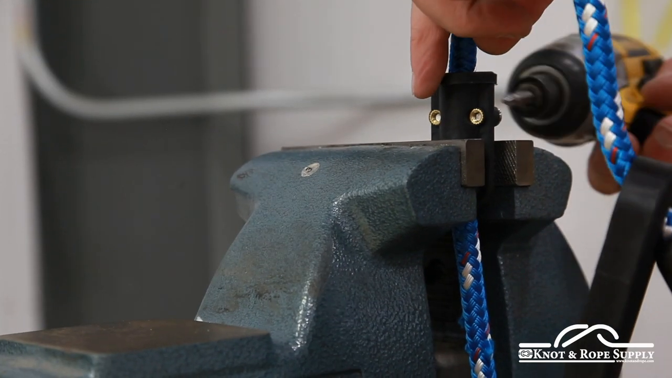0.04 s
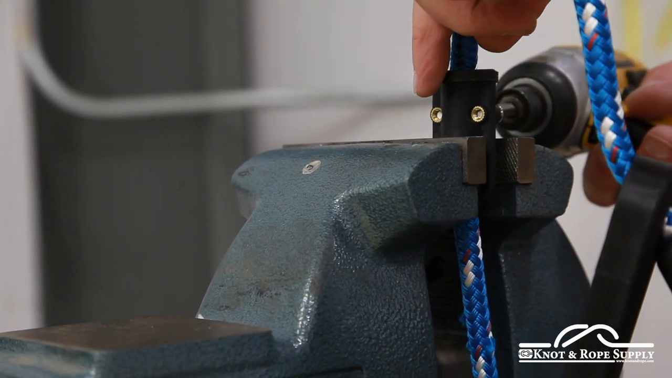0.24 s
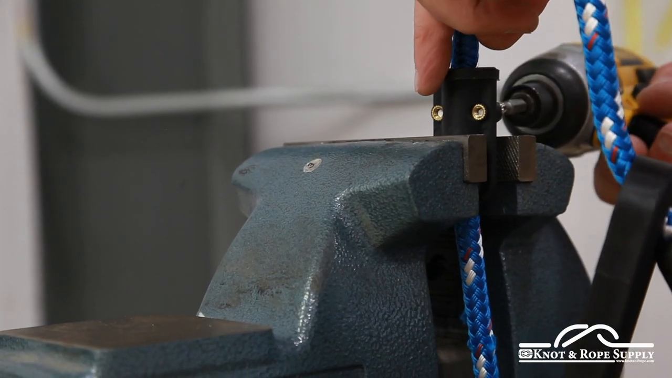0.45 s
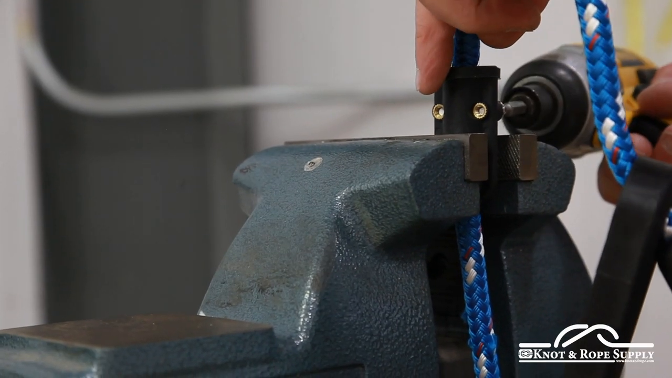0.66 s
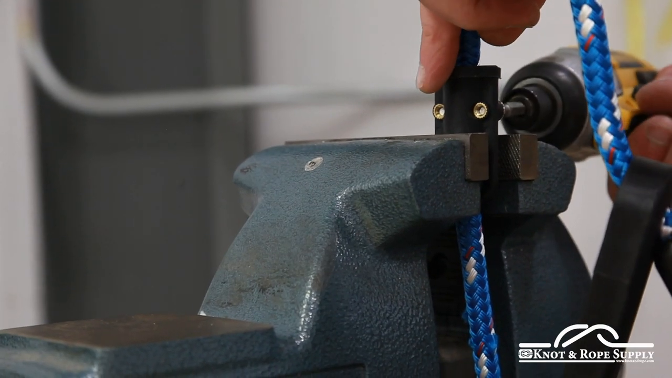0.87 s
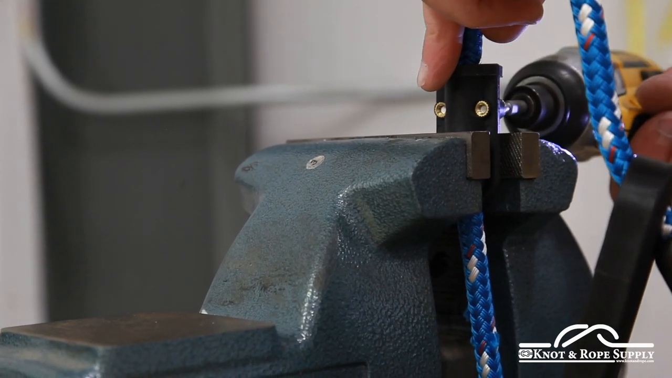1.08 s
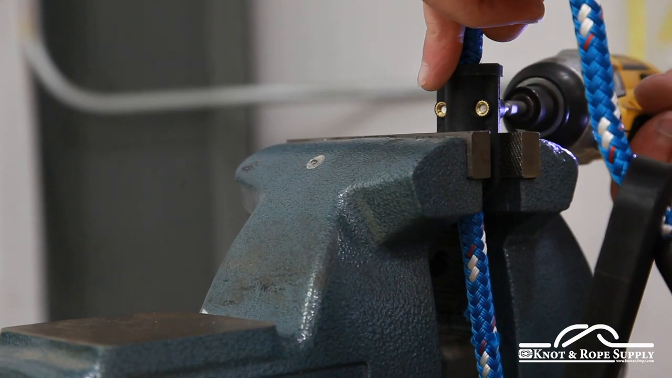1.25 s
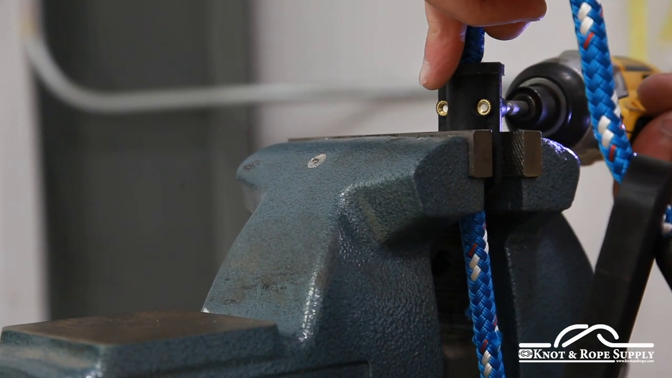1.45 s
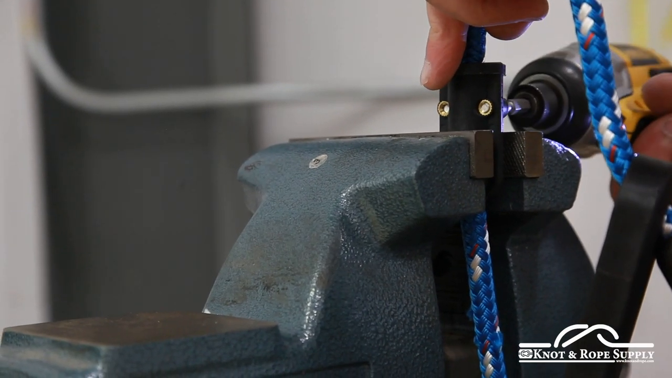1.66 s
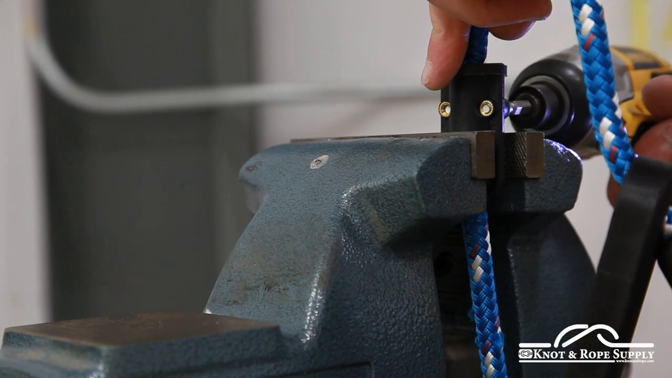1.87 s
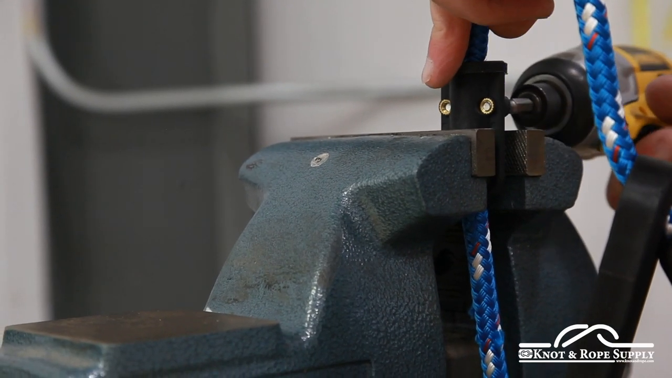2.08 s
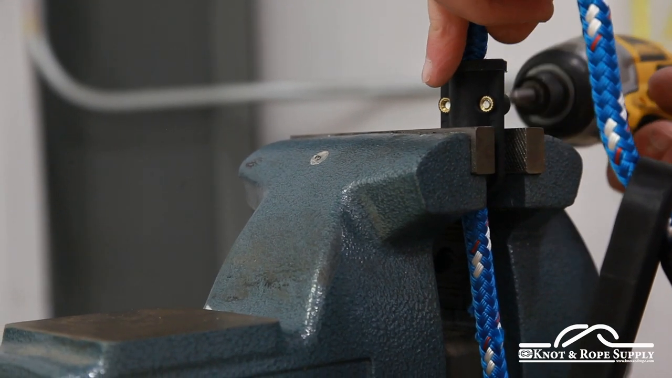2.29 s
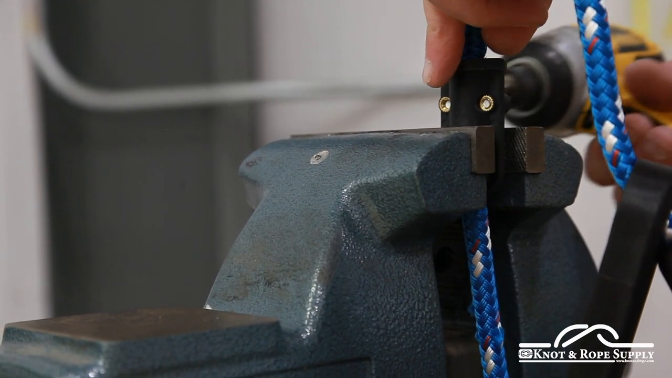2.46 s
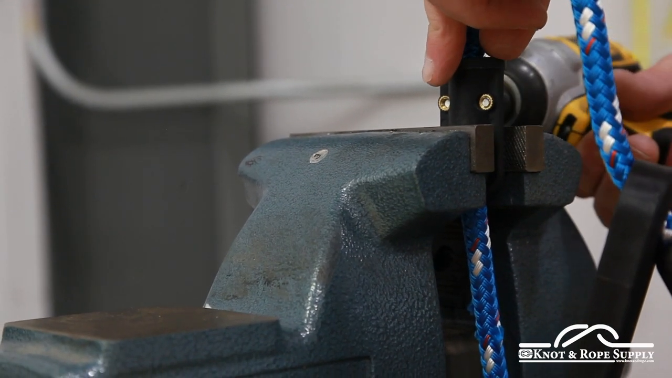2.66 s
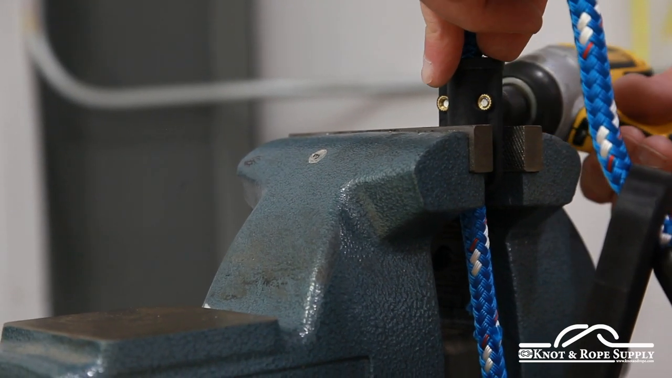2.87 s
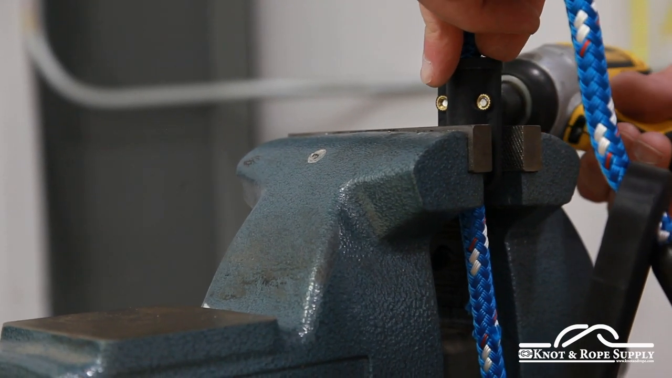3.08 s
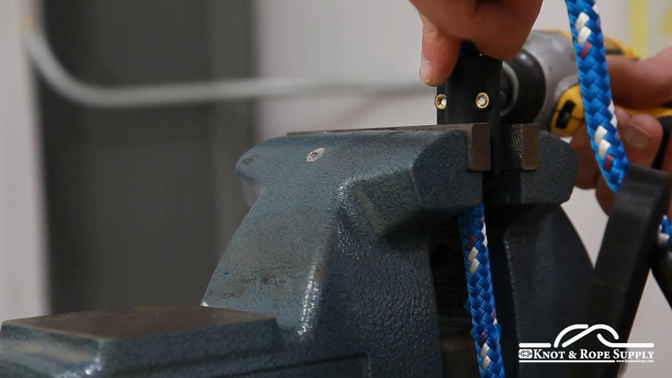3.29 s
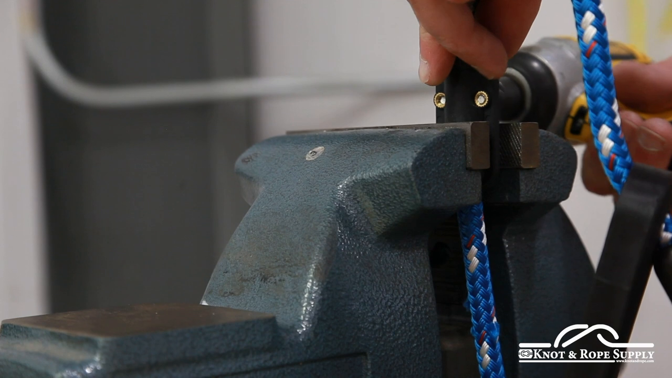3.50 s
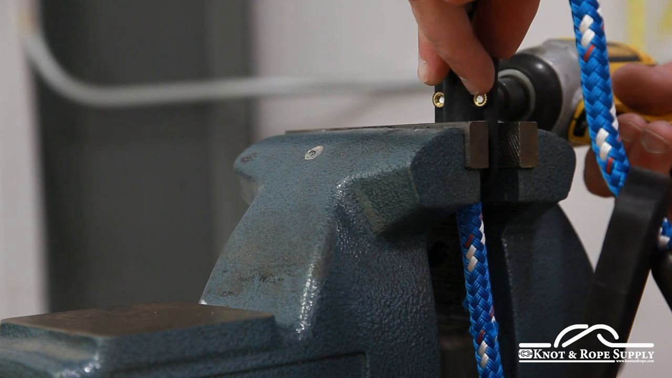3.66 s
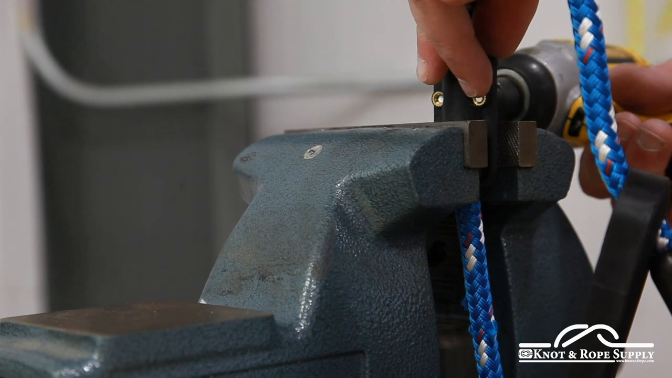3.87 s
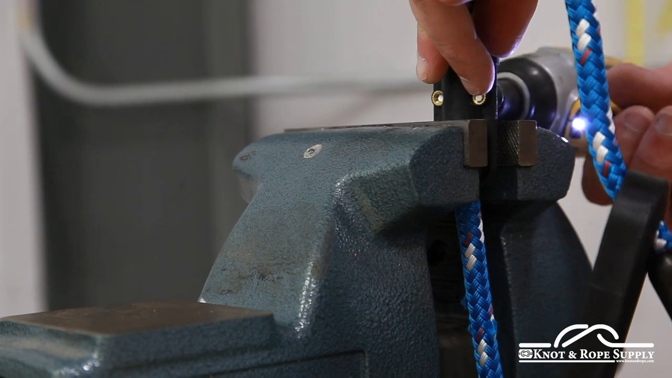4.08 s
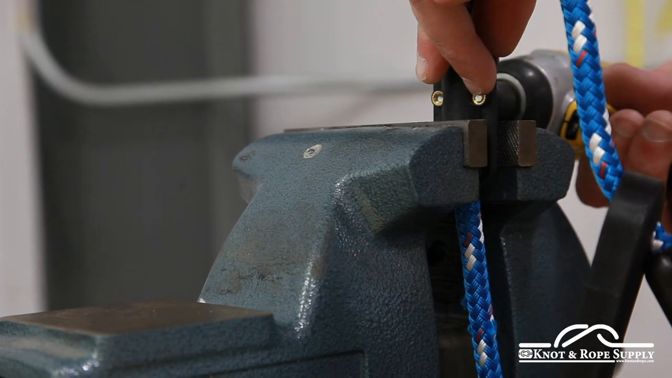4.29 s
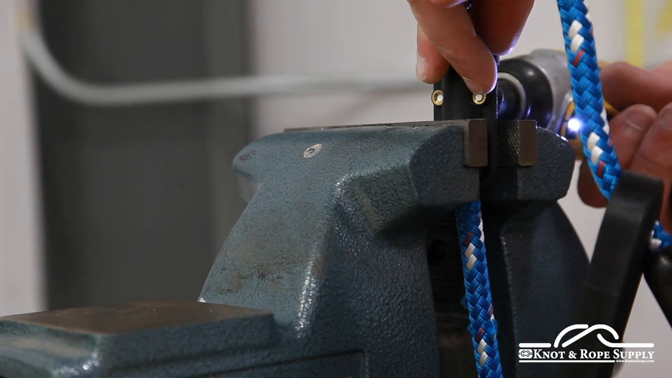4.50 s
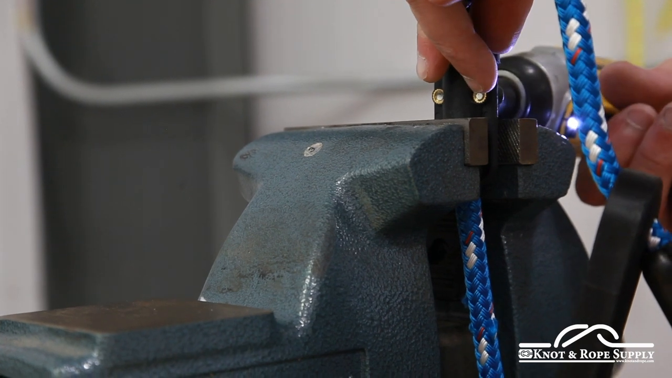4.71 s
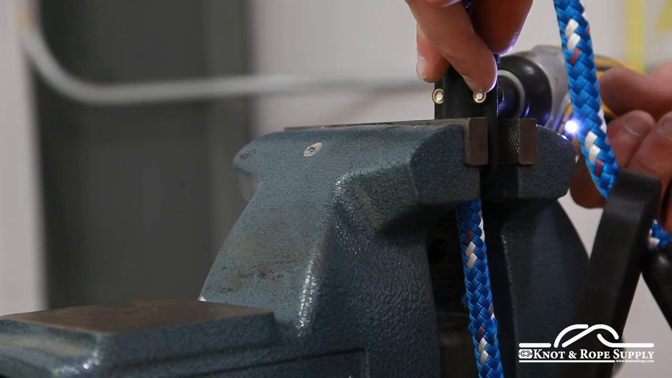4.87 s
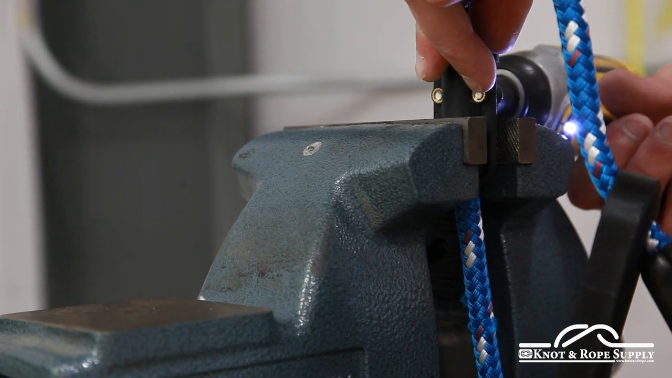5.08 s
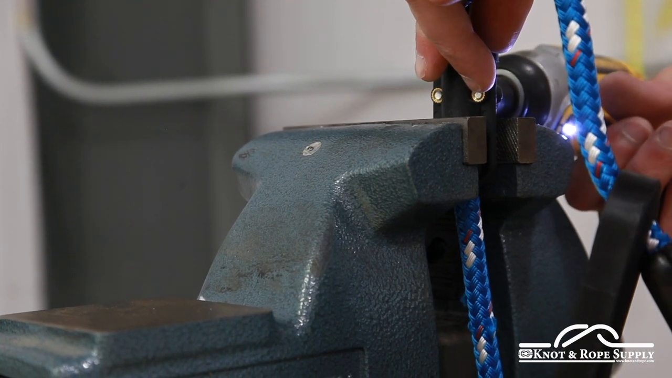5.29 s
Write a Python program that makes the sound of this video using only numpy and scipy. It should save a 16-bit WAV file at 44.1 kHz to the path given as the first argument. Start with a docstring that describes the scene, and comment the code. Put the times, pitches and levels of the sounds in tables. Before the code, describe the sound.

Metal clicks and two brief bursts of a whining cordless driver tightening screws in a workshop, with one loud clatter of hammer blows.

```python
"""A high whistle and a whirr of motor and gears: a cordless impact driver runs two screws into a
rope clamp held in a bench vise, in a workshop. The whistle is the speed control chopping the motor
current. As the first screw seats, the bench thuds and the hammer strikes a few blows that overload
the microphone. In between, the bit scrapes and clicks into the next screw."""
import sys
import numpy as np
from scipy import signal
from scipy.fft import rfft, irfft
from scipy.io import wavfile
from scipy.ndimage import uniform_filter1d

SR = 44100
rng = np.random.default_rng(int(sys.argv[2]) if len(sys.argv) > 2 else 0)


def to_wav(s):
    """Save 16-bit WAV."""
    ch = np.atleast_2d(s).T  # columns
    pcm = np.round(np.clip(ch, -1, 1) * 32767)  # PCM
    wavfile.write(sys.argv[1], SR, pcm.astype(np.int16))


N = 235714
T = np.arange(N) / SR

# Contacts of bit, screw and clamp. Each row: time in seconds, level in dB, relative treble in dB.
CONTACTS = [(0.4748, -25, -10), (0.5327, -30, -1), (0.5536, -22, -46), (0.8674, -20, -9),
            (0.8839, -12.5, -17.5), (0.9115, -24, -12), (1.0266, -6.5, -18), (1.1209, -29, -26.5),
            (1.3164, -11, -18), (2.1226, -4.5, -14), (2.2787, -13.5, -14.5), (2.6753, -25.5, -5),
            (2.9991, -23.5, -36), (3.0475, -31.5, 0.5), (3.0834, -36, -12), (3.1951, -30.5, -1.5),
            (3.2091, -23, -22.5), (3.319, -30, -18.5), (3.3842, -33.5, -12), (3.6905, -24.5, -25.5),
            (3.7519, -32, -1.5), (3.979, -34, -22.5), (4.0163, -20, -31), (4.0692, -23.5, -16),
            (4.1106, -11, -27), (4.156, -7.5, -28), (4.322, -26, -16)]
# Spectrum of light metal contact. Each row: frequency in Hz, density in dB.
CONTACT_SPECTRUM = [(200, -13), (750, -6), (1200, -10.5), (2300, -2.5), (3300, -4.5), (4800, -15.5),
                    (10000, -4), (15500, -18)]


def from_db(db):
    """Decibels to gain."""
    return 10 ** (np.asarray(db) / 20)


def unit_rms(x):
    """Scale to unit rms."""
    return x / np.sqrt(np.mean(x ** 2) + 1e-20)


def at_hz(points, hz):
    """Read a table on a log-frequency axis."""
    points = np.array(points)
    return np.interp(np.log(np.maximum(hz, 1)), np.log(points[:, 0]), points[:, 1])


def noise(n=N):
    """White noise of unit variance."""
    return rng.standard_normal(n)


def drift(rate_hz):
    """Smooth random wander of unit rms."""
    r = np.exp(-2 * np.pi * rate_hz / SR)
    return unit_rms(signal.lfilter([1], [1, -2 * r, r * r], noise(N + SR))[SR:])


def colour(x, spectrum, size=4096):
    """Minimum-phase filter of unit power gain with the given spectrum."""
    hz = np.arange(size // 2 + 1) * SR / size
    gain = unit_rms(from_db(at_hz(spectrum, hz)))
    cepstrum = irfft(np.log(gain))
    cepstrum[1:size // 2] *= 2
    cepstrum[size // 2 + 1:] = 0
    return signal.fftconvolve(x, irfft(np.exp(rfft(cepstrum))))[:N]


def ring(x, hz, t60_s):
    """One mode: a unit impulse starts a decaying sine of height 1."""
    r, w = from_db(-60 / (t60_s * SR)), 2 * np.pi * hz / SR
    return signal.lfilter([0, np.sin(w)], [1, -2 * r * np.cos(w), r * r], x + 1e-18)


def decay(start_s, t60_s):
    """Envelope that jumps to 1 and dies away."""
    start = int(start_s * SR)
    age = T[:min(int(2 * t60_s * SR), N - start)]
    envelope = np.zeros(N)
    envelope[start:start + len(age)] = from_db(-60 * age / t60_s)
    return envelope


def butter(x, hz, kind, order=2):
    """Butterworth filter."""
    return signal.sosfilt(signal.butter(order, hz, kind, fs=SR, output="sos"), x)


def motor(flutter=0.004, throb=0.12, mesh_db=-0.5, tones_db=-2.34, sizzle_db=-21, spun_up_hz=345):
    """Gear teeth tick in the housing, harder once a turn; tones swell as they cross its resonances."""
    # Rotor and gear tones. Each row: multiple of the motor speed, level in dB ahead of the housing.
    orders = [(1, 7.5), (1.78, -4), (2, -9.5), (2.7, -9), (3.56, -4.5), (4.42, -4), (6.2, -6), (8, -5)]
    # Housing response. Each row: frequency in Hz, gain in dB.
    housing = [(250, -27.5), (355, -20.5), (530, -24), (840, -9), (1150, -17.5), (1650, -11), (1850, -9.5),
               (2270, -1.5), (2600, -10.5), (2950, -2.5), (3500, -7.5), (4400, -18), (8000, -20.5),
               (15500, -46.5)]
    speed_hz, gear_gain = drive()
    turns = np.cumsum(speed_hz * (1 + flutter * drift(40))) / SR
    spun_up = np.minimum(speed_hz / spun_up_hz, 1) ** 7
    chatter_db = 0.92 + 1.5 * (1.5 - spun_up)   # slow gears tick one by one
    chatter = from_db(chatter_db * drift(160))
    chatter /= np.sqrt(uniform_filter1d(chatter ** 2, size=3000))
    teeth = noise() * chatter * (1 + throb * np.cos(2 * np.pi * turns))
    mesh = from_db(mesh_db) * unit_rms(colour(teeth, housing))
    tones = 0
    for multiple, db in orders:
        backlash_rad = 0.08 * multiple * drift(75)   # gear play smears the upper tones
        gain = from_db(tones_db + db + at_hz(housing, multiple * speed_hz) + 2 * drift(30))
        tones += gain * np.sqrt(2) * np.sin(2 * np.pi * multiple * turns + backlash_rad)
    sizzle = from_db(sizzle_db) * unit_rms(butter(teeth, [6000, 12000], "band"))
    return gear_gain * (mesh + spun_up * (tones + sizzle))


def drive(binding_s=0.1, gear_db_per_decade=38):
    """Motor speed in Hz and gear gain: each run spins up, holds, then slows as the load takes hold."""
    # Each row: start and onset of slowing in seconds, top speed in turns per second,
    # gear level in dB, spin-up time and slow-down time constant in seconds.
    runs = [(0.976, 1.446, 364, -26, .115, .055), (1.748, 1.9, 150, -26.5, .04, .005),
            (4.075, 4.235, 120, -32, .085, .018), (4.314, 4.44, 140, -37.5, 0.0221, .03),
            (4.417, 4.621, 484, -19.5, .14, .27), (4.901, 5.186, 120, -43, 0.11, .05),
            (5.298, 5.344, 170, -21.5, 0.042, .03)]
    speed_hz, gain = np.zeros((2, N))
    for start_s, slows_s, top_hz, db, spin_up_s, slow_down_s in runs:
        rise = 1 - (1 - np.clip((T - start_s) / spin_up_s, 0, 1)) ** 2
        loaded_s = np.maximum(T - slows_s, 0)
        load = loaded_s / (loaded_s + binding_s)
        share = rise * np.exp(-load * loaded_s / slow_down_s)
        speed_hz = np.maximum(speed_hz, top_hz * share)
        gain = np.maximum(gain, from_db(db) * share ** (gear_db_per_decade / 20))
    return speed_hz * (1 - screw_drag()), gain


def screw_drag():
    """Share of motor speed and whistle pitch lost as the screw drags."""
    # Each row: centre and half-width in seconds, share lost.
    drags = [(1.097, .014, .03), (1.158, 0.021, .024), (1.324, .016, .027), (1.615, 0.063, .048),
             (1.744, .011, .06), (5.3, .07, .02)]
    return sum(share * np.exp(-((T - s) / width_s) ** 2) for s, width_s, share in drags)


def whistle(db_per_hz=0.0497, fade_s=0.0034, octave_db=-23, stutter_db=6):
    """Chopped current makes the windings sing, shaking under load, stuttering at a light trigger."""
    # Each row: start and end in seconds, first and held pitch in Hz, settling time in seconds,
    # level at the held pitch in dB, stutter from 0 to 1.
    whistles = [(0.972, 1.025, 6780, 6150, .045, -63.5, 0.3), (1.033, 1.756, 5330, 6275, .018, -34, 0.2),
                (1.746, 1.91, 5450, 6020, 0.01, -40, 0.03), (4.061, 4.272, 6790, 6550, 0.055, -50.5, 0.99),
                (4.46, 5.301, 5270, 6093, 0.071, -35, 0.07)]
    _, gear_gain = drive()
    sag = screw_drag()
    pitch_hz, gain, stutter = np.zeros((3, N))
    for start_s, end_s, first_hz, held_hz, settle_s, db, unsteady in whistles:
        on = (T >= start_s) & (T < end_s)
        age = T[on] - start_s
        offset_hz = (first_hz - held_hz) * np.exp(-age / settle_s) - held_hz * sag[on]
        pitch_hz[on] = held_hz + offset_hz
        fade = np.minimum(np.minimum(age, end_s - T[on]) / fade_s, 1)
        gain[on] = fade * from_db(db + db_per_hz * offset_hz)   # quieter as the pitch sags
        stutter[on] = unsteady
    jitter = (0.00068 + 0.025 * gear_gain) * drift(80) + 0.016 * stutter * drift(150)
    phase = 2 * np.pi * np.cumsum(pitch_hz * (1 + jitter)) / SR
    gain *= from_db(stutter_db * stutter * drift(80))
    return gain * np.sqrt(2) * (np.sin(phase) + from_db(octave_db) * np.sin(2 * phase))


def hammer(ring_db=-41, ring_t60_s=0.05):
    """Blows on the anvil set the dense modes of driver and vise clanging; the clamp rings briefly."""
    # Each row: time in seconds, level in dB, T60 in seconds.
    blows = [(1.9165, -5.5, 0.06), (1.935, -10.5, 0.061), (1.953, 0, 0.077), (1.965, 12, 0.018),
             (1.977, -0.5, 0.056), (1.984, -6.5, .04)]
    # Each row: frequency in Hz, density in dB.
    clang_spectrum = [(150, -10), (400, -8.5), (550, -10.5), (700, -4.5), (1400, -7.5), (2400, -2.5),
                      (3450, -1), (4200, -13), (11000, -18), (15500, -20)]
    # Each row: frequency in Hz, level in dB.
    clamp_modes = [(1787, 2), (2082, 1.5), (2442, -4.5), (2918, 3), (3151, 1.5), (3399, -4.5)]
    envelope = sum(from_db(db) * decay(s, t60_s) for s, db, t60_s in blows)
    force = uniform_filter1d(envelope, size=50) * noise()
    clang = butter(colour(force, clang_spectrum), 130, "high", order=4)
    return clang + sum(from_db(ring_db + db) * ring(force, hz, ring_t60_s) for hz, db in clamp_modes)


def bench(rumble_db=-15, shake_db=-29):
    """Torque jolts the vise: the bench booms and rumbles, and things on it shake."""
    # Each row: time in seconds, level in dB.
    jolts = [(1.848, -3.5), (1.864, 0.5), (1.87, 3), (1.881, -15), (1.953, -8), (2.072, -8.5),
             (2.19, -23.5), (2.341, -26)]
    # Each row: frequency in Hz, level in dB.
    modes = [(100, -6), (178, -8.5), (275, -10), (327, -12)]
    pushes, rumble, shake = np.zeros((3, N))
    for s, db in jolts:
        pushes[int(s * SR)] = from_db(db)
        rumble += from_db(db + rumble_db) * decay(s, t60_s=0.3)
        shake += from_db(db + shake_db) * decay(s, t60_s=0.29)
    boom = sum(from_db(db) * ring(pushes, hz, t60_s=0.12) for hz, db in modes)
    rumble *= unit_rms(butter(noise(), [170, 340], "band", order=1))
    shake *= unit_rms(butter(noise(), [700, 1600], "band"))
    return butter(boom + rumble, [105, 390], "band", order=4) + shake


def rotor_chirps(t60_s=0.043, rise_hz_per_s=45000):
    """The rotor jerks into motion with a short rising squeak."""
    # Each row: start in seconds, level in dB, first pitch in Hz.
    chirps = [(1.756, -19, 2920), (5.302, -19, 3020)]
    sound = 0
    for s, db, hz in chirps:
        cycles = (T - s) * (hz + rise_hz_per_s * (T - s) / 2)
        sound += from_db(db) * decay(s, t60_s) * np.sin(2 * np.pi * cycles)
    return sound


def bit_clicks(body_db=-6, scrape_db=-20, rattle_db=-19, scrape_s=0.015, split_hz=5500):
    """Metal meets metal: a brief scrape, a crack and a rattle, brighter for glancing contacts."""
    body, edge = np.zeros((2, N))
    for s, db, treble_db in CONTACTS:
        scrape = from_db(scrape_db) * np.maximum(1 - np.abs(T - s) / scrape_s, 0)
        crack = decay(s, t60_s=0.011)
        rattle = from_db(rattle_db) * decay(s, t60_s=0.11)
        body += from_db(db + body_db) * (scrape + crack + rattle)
        edge += from_db(db + treble_db) * crack
    grain = noise()
    contact = butter(body * grain, [350, split_hz], "band") + butter(edge * grain, split_hz, "high")
    return colour(contact, CONTACT_SPECTRUM)


def bit_scrapes(slips_per_s=260, spread_db=6, slip_t60_s=0.031):
    """The bit sticks and slips over clamp and screw head in small uneven ticks."""
    # Each row: start and end in seconds, level in dB.
    strokes = [(0.461, 0.499, -39.5), (0.848, 0.937, -48), (2.813, 3.353, -53.5), (3.031, 3.135, -45.5),
               (3.678, 3.768, -41.5), (3.811, 3.996, -64.5)]
    envelope = 0
    for start_s, end_s, db in strokes:
        position = 2 * (T - start_s) / (end_s - start_s) - 1
        envelope += from_db(db) * np.sqrt(np.maximum(1 - position ** 2, 0))
    slips = (rng.random(N) < slips_per_s / SR) * from_db(spread_db * noise())
    pole = from_db(-60 / (slip_t60_s * SR))
    ticks = signal.lfilter([1], [1, -pole], slips + 1e-18) * noise()
    dulled = butter(ticks, 2100, "low", order=1)
    return envelope * unit_rms(colour(dulled, CONTACT_SPECTRUM))


def body_bumps(thud_db=-4, t60_s=0.05):
    """The driver bumps home against the screw; its plastic body knocks dully."""
    # Each row: time in seconds, level in dB, pitch in Hz.
    bumps = [(0.476, -40.5, 394), (0.885, -26.5, 367), (3.32, -39, 962), (4.019, -26, 726),
             (4.161, -21, 622), (5.337, -25, 502)]
    thud = from_db(thud_db) * unit_rms(butter(noise(), [180, 1100], "band"))
    return sum(from_db(db) * decay(s, t60_s) * (np.sin(2 * np.pi * hz * (T - s)) + thud)
               for s, db, hz in bumps)


def steel_ring(cap_db=-32, chatter_db=6):
    """Contacts leave the vise humming; bright, glancing ones make the loose bit ping and chatter."""
    # Vise, then bit. Each row: frequency in Hz, level in dB, T60 in seconds.
    modes = [(695, -24, 1.6), (13900, -10, 0.082)]
    taps, glances = np.zeros((2, N))
    for s, db, treble_db in CONTACTS:
        taps[int(s * SR)] = from_db(min(db + treble_db, cap_db))
        glances[int(s * SR)] = from_db(min(db, cap_db) + 2 * min(treble_db, 0))
    vise, bit = (from_db(db) * ring(touches, hz, t60_s)
                 for touches, (hz, db, t60_s) in zip((taps, glances), modes))
    return vise + bit * from_db(chatter_db * drift(150))


def workshop_reverb(x, build_s=0.0028, lowpass_hz=5500):
    """Diffuse reflections build up quickly and die sooner in the treble."""
    # Each row: frequency in Hz, T60 in seconds.
    decay_times = [(100, 1.0), (300, .85), (1000, 1), (3000, 0.61), (6000, 1), (14000, 0.24)]
    age, edges_hz = T[:SR], np.geomspace(60, 16000, num=9)
    tail = 0
    for low, high in zip(edges_hz, edges_hz[1:]):
        t60_s = at_hz(decay_times, np.sqrt(low * high))
        tail += butter(noise(SR), [low, high], "band") * from_db(-60 * age / t60_s)
    tail *= 1 - np.exp(-(age / build_s) ** 2)
    tail /= np.sqrt(np.sum(tail ** 2))
    return signal.fftconvolve(x, butter(tail, lowpass_hz, "low", order=1))[:N]


def background(room_db=-53, hum_hz=98, hum_db=-61):
    """Low room noise, a wavering hum and a soft hiss that swells and sinks."""
    # Each row of both spectra: frequency in Hz, density in dB.
    room_spectrum = [(20, -12.5), (85, -1), (210, -6), (450, -15), (800, -16.5), (1700, -25), (5500, -42.5),
                     (15000, -42.5)]
    hiss_spectrum = [(200, -1.5), (500, -5.5), (2500, -3.5), (3400, 1.5), (7000, -16), (15500, -31.5)]
    # Each row: time in seconds, level in dB.
    hiss_levels = [(0, -48), (0.2, -43), (0.45, -52), (0.8, -52), (1.7, -70), (2.5, -51), (2.9, -55.5),
                   (3.3, -63.5), (5.3, -69.5)]
    room = from_db(room_db) * colour(noise(), room_spectrum)
    hum = from_db(hum_db + 3 * drift(3)) * np.sin(2 * np.pi * hum_hz * T + drift(18))
    hiss_db = np.interp(T, *np.transpose(hiss_levels))
    return room + hum + from_db(hiss_db) * colour(noise(), hiss_spectrum)


def scene():
    """Driver, vise and bench close up, over weaker reverberation and background; mono."""
    driver = motor() + rotor_chirps() + bit_clicks() + bit_scrapes() + body_bumps() + whistle()
    blows, boom = hammer(), bench()
    reverb = workshop_reverb(from_db(-12) * driver + from_db(-16) * blows + from_db(-11) * boom)
    return (driver + blows + boom + steel_ring() + reverb + background())[None]


def record(dry, hardness=6, cutoff_hz=15700):
    """The loudest peaks overload the microphone; a steep low-pass cuts the top."""
    clipped = dry / (1 + np.abs(dry) ** hardness) ** (1 / hardness)
    return signal.sosfilt(signal.ellip(10, 0.1, 70, cutoff_hz, fs=SR, output="sos"), clipped)


dry = scene()
out = record(dry)
to_wav(out)
```